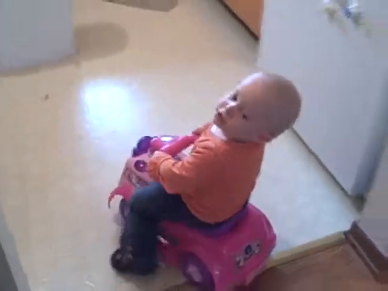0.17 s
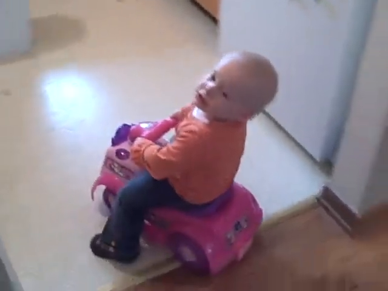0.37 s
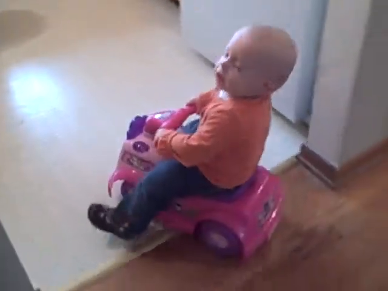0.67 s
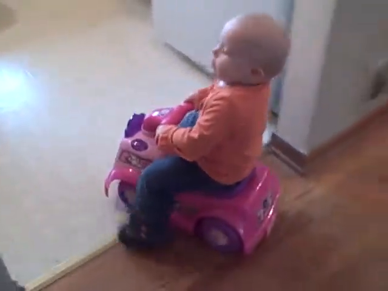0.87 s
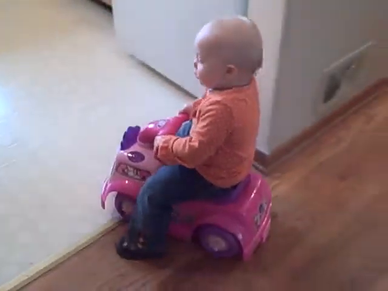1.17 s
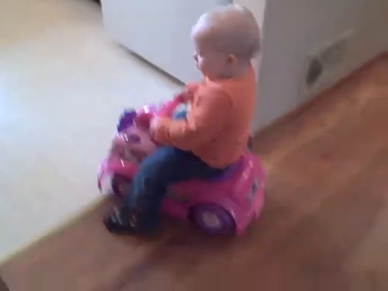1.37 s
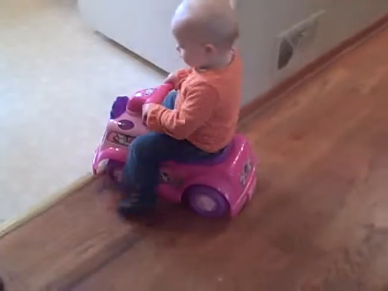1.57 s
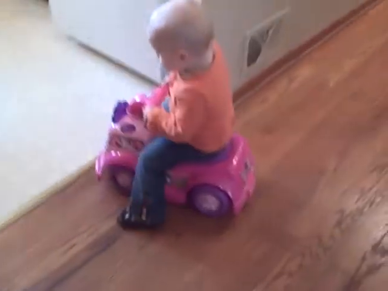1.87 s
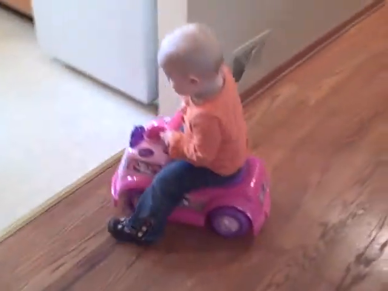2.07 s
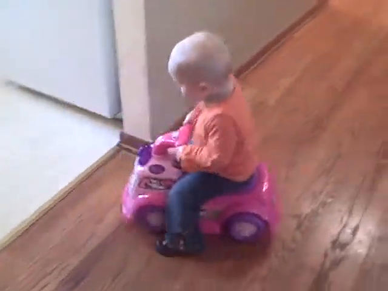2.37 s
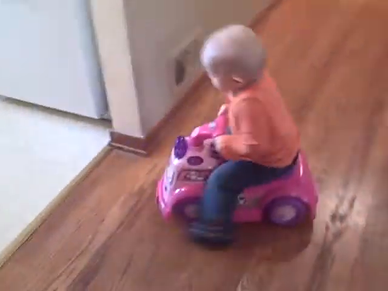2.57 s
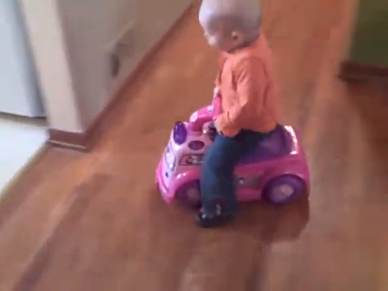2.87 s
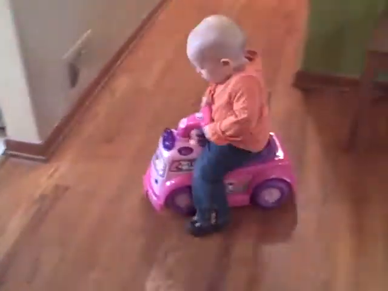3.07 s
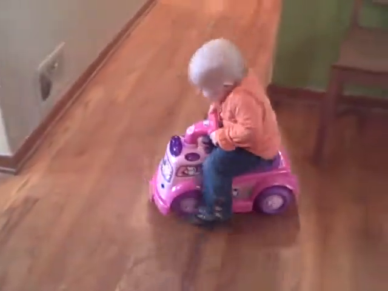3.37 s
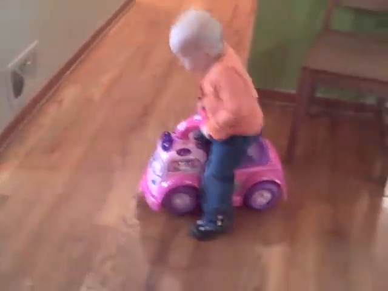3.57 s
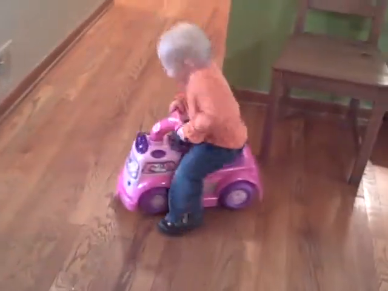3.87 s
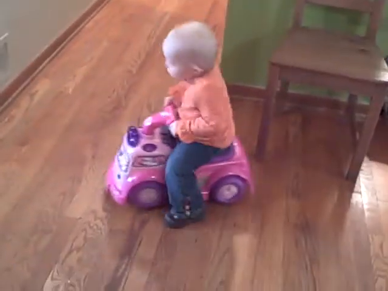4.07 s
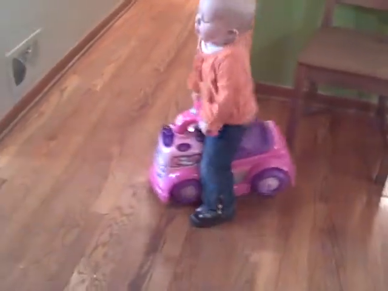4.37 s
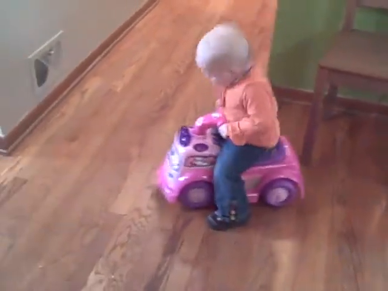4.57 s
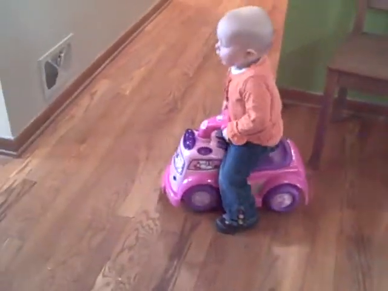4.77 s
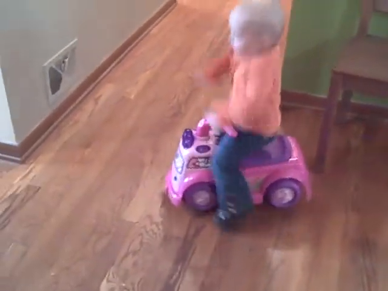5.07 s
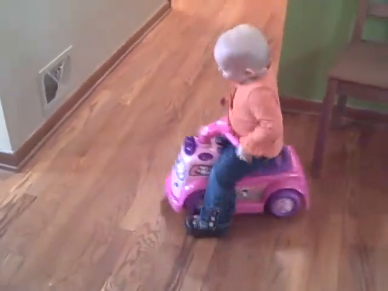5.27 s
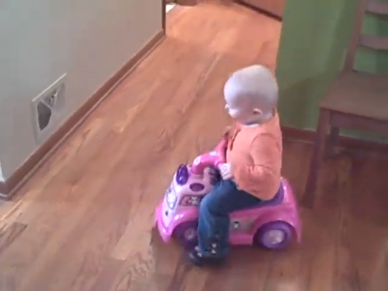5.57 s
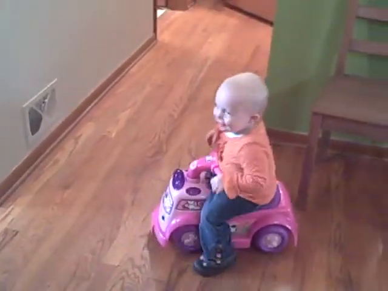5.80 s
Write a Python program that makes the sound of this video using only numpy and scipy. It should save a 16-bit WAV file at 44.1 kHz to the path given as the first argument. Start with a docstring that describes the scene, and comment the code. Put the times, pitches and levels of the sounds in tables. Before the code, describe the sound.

A mono indoor pickup, a few steps from a hollow plastic ride-on car on hardwood, in a bare room with about half a second of reverberation. A faint, wavering low refrigerator hum and soft room air sit underneath, the hum slowly fading. From 0 to 0.7 seconds, light plastic ticks and knocks lead to a crisper clack. From 1 to 2.7 seconds it is quieter: small dull bumps, short rumbling, gritty shoves, brushing soles and a barely audible axle squeak near 1.2. A fuller knock comes at 3.0 and a hollow double thud at 3.5. A tight burst of loud, bright clacks strikes around 3.8 to 3.9. The strongest cluster follows at 4.4 to 4.6, with a hollow body note, then smaller knocks at 4.7 to 5.05 and another sharp bang at 5.2. Rolling and scraping rise again near 5.3, then light taps and very faint bumps die away by 5.85.

```python
"""A bare room with a hardwood floor, beside a kitchen: a toddler shuffles a hollow plastic ride-on car
over a threshold and along the boards, then bounces on its seat. Each knock excites modes of floor, hollow
body and panels, and ticks at the contact; dull bumps are decaying hollow notes. Filtered noise and grit make
the rolling wheels, brushing soles, a faint axle squeak and the room air. A refrigerator hums as a wavering
sine, and echoes with band-by-band decay return the knocks, bumps and scrape."""
import sys
import numpy as np
from scipy import signal
from scipy.fft import rfft, irfft
from scipy.io import wavfile

SR = 44100
rng = np.random.default_rng(int(sys.argv[2]) if len(sys.argv) > 2 else 0)


def master(y):
    """Save y as 16-bit WAV."""
    cut = np.clip(np.atleast_2d(y).T, -1, 1)
    pcm = np.round(cut * 32767)  # scale
    wavfile.write(sys.argv[1], SR, pcm.astype(np.int16))


N = 261689  # length of the scene in samples
T = np.arange(int(.65 * SR)) / SR  # time axis of one short sound, s

# Knocks of the car: start_s, strength_db, contact_hardness_db, floor_share_db, chatter_s
KNOCK_EVENTS = [ (0.077, -57, 4, -15.5, .005), (.162, -54, -4, 0, .002), (0.2774, -51.5, -4, 3, .0005),
                (0.3959, -44, 9.5, -21, .0016), (0.489, -44.5, 2.5, -25, .005),
                (.508, -48.5, -2.5, 1.5, .003), (.653, -47, 5, 0.5, 0.0037),
                (0.6858, -36.5, 11.5, -16, .0015), (1.033, -56, 0, 8, .005), (1.287, -56, 3, -9, .002),
                (1.545, -54.5, -4, -16, .002), (1.567, -47, 0, 1.5, 0.0034), (1.645, -51.5, -6.5, -2, .002),
                (1.685, -54, -8, -7, 0.0035), (1.882, -59, 5.5, 0, 0.005), (2.1545, -62.5, 25, 0, .002),
                (2.308, -54.5, -15, -14, .02), (2.6111, -47, -0.5, 2.5, .0007), (2.89, -54, -7.5, 5, .003),
                (2.9885, -34.5, 1.5, -8, .0012), (3.012, -33, 4, 5, .015), (3.156, -47.5, -4.5, 9, .008),
                (3.2153, -45.5, -3, -3, .0007), (3.413, -55.5, 3, -8, .003), (3.516, -37, -3, 5, .0011),
                (3.5247, -31, -2.5, 3, .0016), (3.698, -47.5, -3, -6, 0.0095), (3.7996, -49.5, 6, -6, .004),
                (3.8149, -36.5, 3, -20, .005), (3.821, -24, -0.5, -3, .0096), (3.8576, -21, 7, -5.5, .0004),
                (3.864, -25, 0, -0.5, 0.0013), (3.881, -27, 13, 0, 0.0014),
                (4.2606, -55.5, -1.5, -1.5, .001), (4.3609, -45.5, -5, -12, .007),
                (4.4113, -39.5, 1.5, -19, .0023), (4.458, -30.5, -1.5, -17, .007),
                (4.509, -35, -1, 2.5, .011), (4.559, -20, 16.5, 1.5, .0013), (4.563, -17, 0, -3, .004),
                (4.727, -37, 9, -29, .008), (4.767, -40.5, 0.5, -20, .003), (4.8458, -29, 1, -16, .0004),
                (4.859, -35, -5.5, -1, .0013), (4.9975, -27, 4, -10.5, 0.0013),
                (5.045, -33.5, -2.5, -2, .023), (5.178, -39, -2, -31, .008), (5.1911, -27, 11, -0.5, .004),
                (5.1952, -20.5, 2.5, -17, .002), (5.4051, -38, 5.5, -24, .0023),
                (5.468, -46, 2.5, -20, .0024)]
# Resonances of the floor boards: pitch_hz, level_db, t60_s
FLOOR_MODES = [(59.5, -4.5, 0.11), (82, -14.5, 0.16), (128.3, -2, 0.19), (153, 0, 0.29), (190, 2.5, 0.082)]
# Resonances of the hollow car body: pitch_hz, level_db, t60_s
BODY_MODES = [(235.5, -2.5, 0.055), (294, 0.5, 0.094), (334.6, 0.5, 0.041), (380, -4, 0.1),
              (431, -7.5, 0.12), (478.2, -4.5, 0.078), (577, -13, 0.14)]
# Resonances of the plastic panels: pitch_hz, level_db, t60_s
PANEL_MODES = [(730, -0.5, 0.083), (745, -2.5, 0.087), (1030, -8, 0.04), (1114, 1.5, 0.047),
               (1226, 2, 0.044), (1380, 6, 0.035), (1640, -2.5, 0.071), (1782, 2.5, 0.043),
               (1971, 2, 0.045), (2390, -2.5, 0.033)]
# Relative spectrum of the crowded panel modes at hardness 0 dB: frequency_hz, density_db_per_hz
CLACK_SPECTRUM = [(250, -26.5), (550, 1), (800, 8.5), (1200, 0), (1800, 3.5), (2600, 1.5), (3700, -14),
                  (6000, -52.5), (16000, -68)]
# Relative spectrum at the point of contact, before the strength lift: frequency_hz, density_db_per_hz
TICK_SPECTRUM = [(600, -28), (2000, -8), (3200, -1), (4900, 0), (7300, -2.5), (8600, -6.5), (10500, -7.5),
                 (13000, -10.5), (16000, -11)]
# Relative spectrum of stiff plastic snapping at the contact: frequency_hz, density_db_per_hz
SNAP_SPECTRUM = [(1500, -43), (3500, 1), (5000, 2), (7000, -7.5), (9000, -16), (16000, -50)]
# Dull bumps of shoes, wheels and the rider's weight on the hollow car: start_s, pitch_hz, level_db
BUMP_EVENTS = [(0.161, 265.5, -33), (.69, 54.6, -43), (1.027, 268, -45), (1.644, 686, -42.5),
               (1.686, 276, -30), (2.314, 680, -45), (2.756, 157, -34.5), (3.024, 820, -37),
               (3.524, 257, -25.5), (4.568, 382, -14.5), (4.584, 143, -25.5), (5.198, 260, -26),
               (5.781, 290, -46.5), (5.835, 149, -49)]
# Shoves that roll the car a little way: top_speed_s, length_s, rumble_db, scrape_db
SHOVE_EVENTS = [(0.006, 0.2, -57, -54), (0.306, 0.14, -47.5, -77), (0.878, 0.12, -55, -56),
                (1.698, 0.068, -47, -50), (2.054, .14, -57, -63.5), (2.306, 0.041, -45.5, -49),
                (2.57, 0.22, -48.5, -52), (2.713, 0.069, -38.5, -43.5), (3.066, 0.17, -39, -46),
                (3.39, 0.02, -45, -48.5), (3.66, 0.19, -46, -50), (4.02, 0.079, -46, -48),
                (4.432, 0.14, -44.5, -47.5), (4.95, .17, -45, -44.5), (5.297, 0.1, -39, -41)]
# Relative spectrum of wheels rumbling on boards: frequency_hz, density_db_per_hz
RUMBLE_SPECTRUM = [(25, -32), (55, 7), (90, 7), (150, 2.5), (290, 5), (480, -3.5), (900, -8.5),
                   (1600, -33.5), (5000, -66)]
# Relative spectrum of one scraping grain of grit: frequency_hz, density_db_per_hz
SCRAPE_SPECTRUM = [(300, -9.5), (900, 11.5), (1700, 3), (2600, 2.5), (4200, -3), (6500, -5.5), (9000, -6.5),
                   (16000, -13)]
# Shoe soles hissing over the floor: peak_s, length_s, level_db
SCUFF_EVENTS = [(.19, .06, -61), (.87, 0.091, -64), (1.73, 0.11, -62), (2.33, .05, -63), (2.72, 0.072, -58),
                (3.39, .03, -58)]
# Relative spectrum of a brushing sole: frequency_hz, density_db_per_hz
SOLE_SPECTRUM = [(1000, -29), (3000, -6), (7000, -2), (11000, 0), (16000, -3)]
# Resonances of a rubbing axle: pitch_hz, width_hz (before broadening), level_db (relative)
AXLE_MODES = [(2850, 34, -5), (3540, 45, -7), (3920, 29, -4)]
# The rider's weight heaving on the boards: peak_s, length_s, level_db
HEAVE_EVENTS = [(3.85, .35, -43.5), (4.65, .35, -51.5)]
# Relative spectrum of the room air: frequency_hz, density_db_per_hz
AIR_SPECTRUM = [(20, -34.5), (55, 8.5), (90, -9.5), (140, 5.5), (300, -1.5), (600, -2.5), (1500, -16.5),
                (4500, -19.5), (9000, -27), (16000, -29.5)]
# Reverberation time of the bare room: frequency_hz, t60_s
ROOM_DECAY = [(80, 0.58), (260, 0.45), (700, 0.55), (1840, 0.58), (4850, 0.51), (8000, 0.41), (14000, 0.29)]

BODY_DB, TICK_DB = 4, -4.5  # boom and tick relative to the clack, at hardness 0 dB
TICK_PER_HARDNESS = 0.47  # tick gain in dB per dB of hardness; the boom loses 1 dB per dB
CLACK_OCTAVES_PER_DB = 0.0347  # upward shift of the clack per dB of hardness
LIFT_PER_DB, LIFT_FROM_DB = 0.43, -29.5  # treble lift of the tick per dB of strength above this level
SNAP_DB, SNAP_CHATTER_S = -6, .002  # snap beside the tick; it fades out for longer chatter
FLOOR_LAG_S, BODY_LAG_S = .005, .0015  # the heavy parts answer a moment after the contact
SWELL_CYCLES = 0.87  # time constant of a bump, in cycles of its note
RISE_DB, COAST_DB = 12, 7.5  # gained over one length before a peak, lost over one length after it
CREEP_RUMBLE_DB, CREEP_SCRAPE_DB = -65.5, -65  # the car never stands quite still
SOLE_REST_DB, SWAY_REST_DB = -79, -61  # resting levels of the soles and of the deep rumble
HUM_DB, HUM_FADE_DB_PER_S = -55, 3  # the refrigerator fades as the car leaves the kitchen
EDGE_HZ = 16100  # upper band limit


def knocks(panel_ring_db=-3, bright_hz=8000, snap_decay=0.00017):
    """Impact excitation: loose plastic chatters briefly, and floor, body and panels ring on as resonators."""
    out, snap_colour = np.zeros(N), colour(SNAP_SPECTRUM)
    hz = np.fft.rfftfreq(2 * len(snap_colour), 1 / SR)
    treble = 1 / (1 + (bright_hz / (hz + 1)) ** 6)
    for start_s, strength_db, hard_db, floor_db, chatter in KNOCK_EVENTS:
        echoes = room()  # the echoes change as car and rider move

        # the low modes feel the contact as one push
        push = signal.unit_impulse(len(T))
        floor_ring = ring(FLOOR_MODES, vary_db=1.5, detune=0.0069)
        thump = later(through(push + gain_of(-5.0) * echoes, floor_ring), FLOOR_LAG_S)
        body_ring = ring(BODY_MODES, vary_db=3.0, detune=0.0069)
        boom = later(through(push + gain_of(3.5) * echoes, body_ring), BODY_LAG_S)

        # a few clear panel modes stand out of many crowded ones
        rattle = blow(chatter, echoes, wet_db=0.5, buzz_db=-2.5, buzz_decay=0.008,
                      rebound_db=-3.0, snap_db=3.5)
        panels = unit(through(rattle, ring(PANEL_MODES, vary_db=-1.0, detune=0.0089)))
        shifted_hz = hz / 2 ** (CLACK_OCTAVES_PER_DB * hard_db)
        clack_colour = colour(np.transpose([hz, read(CLACK_SPECTRUM, shifted_hz)]))
        clack = unit(through(rattle, clack_colour)) + gain_of(panel_ring_db) * panels

        # a stronger contact lifts the top octave
        lift_db = LIFT_PER_DB * (strength_db - LIFT_FROM_DB)
        tick_colour = colour(np.transpose([hz, read(TICK_SPECTRUM, hz) + lift_db * treble]))
        tick_blow = blow(chatter, echoes, wet_db=0.5, buzz_db=-0.5, buzz_decay=0.005,
                         rebound_db=-9.0, snap_db=2.5)
        tick = through(tick_blow, tick_colour)
        snap_gain = gain_of(SNAP_DB) * np.exp(-chatter / SNAP_CHATTER_S)
        snap = snap_gain * unit(through(burst(snap_decay), snap_colour))

        tick_db = TICK_DB + TICK_PER_HARDNESS * hard_db
        parts = ((floor_db, thump), (BODY_DB - hard_db, boom), (0, clack), (tick_db, unit(tick) + snap))
        add(out, start_s, sum(gain_of(strength_db + db) * loudness(part) for db, part in parts))
    return out


def blow(chatter, echoes, wet_db, buzz_db, buzz_decay, rebound_db, snap_db,
         crush_time=0.077, snap_time=0.00072, hard_time=0.0016):
    """Contact mechanics: a crush or snap, the short buzz of damped plastic, rebounds, and room echoes."""
    chatter = max(chatter, 1e-4)
    build = 1 - np.exp(-T * crush_time / chatter ** 2)  # long contacts build up softly
    contact = unit(burst(chatter) * build)
    snap = gain_of(snap_db) * np.exp(-chatter / hard_time) * burst(snap_time)  # short ones start with a snap
    onset = 1 - np.exp(-T / chatter)  # the room fills as the contact goes on
    buzz = gain_of(buzz_db) * burst(buzz_decay)
    after = buzz + gain_of(rebound_db) * rebounds() + gain_of(wet_db) * echoes
    return unit(contact + snap) + onset * after


def rebounds(per_s=300, decay=0.026, ring_time=0.00096):
    """Repeated impact with energy loss: loose parts tap at uneven moments, ever more weakly."""
    struck = rng.random(len(T)) < per_s / SR
    taps = struck * rng.uniform(.3, 1, len(T)) * np.exp(-T / decay) * (T > .004)
    envelope = signal.lfilter([1], [1, -np.exp(-1 / (ring_time * SR))], taps)
    return unit(envelope * rng.standard_normal(len(T)))


def burst(decay):
    """Superposed micro-impacts: noise whose amplitude dies exponentially."""
    return unit(rng.standard_normal(len(T)) * np.exp(-T / max(decay, 1e-4)))


def ring(modes, vary_db, detune, size=8000):
    """Modal superposition: damped sines, weighted anew since every blow lands elsewhere."""
    hz, db, t60 = np.transpose(modes)[:, :, None]
    weight, shift, side = rng.standard_normal((3, len(modes), 1))
    t = T[:size]
    envelope = gain_of(db + vary_db * weight - 60 * t / t60)
    waves = np.sign(side) * envelope * np.sin(2 * np.pi * hz * (1 + detune * shift) * t)
    return unit(waves.sum(0))


def bumps(wall_delay=0.0139, wet_db=-4):
    """Damped resonance: a soft blow swells into a few cycles of one hollow note, which the walls return."""
    out = np.zeros(N)
    for start_s, hz, db in BUMP_EVENTS:
        swell = SWELL_CYCLES / hz
        note = unit((T / swell) ** 2 * np.exp(-T / swell) * np.sin(2 * np.pi * hz * T))
        echoes = later(room(), wall_delay)
        returned = gain_of(wet_db) * unit(through(note, echoes))
        add(out, start_s, gain_of(db) * loudness(note + returned))
    return out


def wheels(echoes, grits_per_s=1800, grit_spread_db=3, wet_db=4):
    """Rolling and friction noise: hard wheels rumble; random impulses of grit and soles scrape."""
    rumble = surges([(s, length, db) for s, length, db, _ in SHOVE_EVENTS], CREEP_RUMBLE_DB)
    scrape = surges([(s, length, db) for s, length, _, db in SHOVE_EVENTS], CREEP_SCRAPE_DB)
    size_db = grit_spread_db * np.minimum(rng.exponential(1, N), 3)
    sizes = rng.choice([-1, 1], N) * gain_of(size_db)
    grit = through(sizes * (rng.random(N) < grits_per_s / SR), colour(SCRAPE_SPECTRUM))
    grit_in_room = evened(grit + gain_of(wet_db) * through(grit, echoes))
    return rumble * noise(RUMBLE_SPECTRUM) + scrape * grit_in_room


def scuffs():
    """Sliding friction: soles brush the floor as the feet push off, heard as swells of hiss."""
    return surges(SCUFF_EVENTS, SOLE_REST_DB) * noise(SOLE_SPECTRUM)


def squeak(peak_s=1.214, length=0.065, level_db=-64.0, broadening=2.9):
    """Frictional resonance: a rubbing axle whistles faintly in narrow noise bands as the car turns."""
    hz = np.fft.rfftfreq(N, 1 / SR)
    shape = sum(gain_of(db) / (1 + (2 * (hz - f) / (broadening * width)) ** 2)
                for f, width, db in AXLE_MODES)
    whistle = evened(irfft(rfft(rng.standard_normal(N)) * shape, N))
    swell = np.exp(-.5 * ((np.arange(N) / SR - peak_s) / length) ** 2)
    return gain_of(level_db) * whistle * swell


def house(air_db=-57, hum_hz=120, hum_waver_db=2, sway_hz=29, sway_width_hz=5):
    """Steady background: room air, a refrigerator's modulated tone, and deep rumble under moving weight."""
    t = np.arange(N) / SR
    hz = np.fft.rfftfreq(N, 1 / SR)
    waver = evened(irfft(rfft(rng.standard_normal(N)) * np.exp(-(hz / 4) ** 2), N))  # a few Hz
    hum = np.sqrt(2) * np.sin(2 * np.pi * hum_hz * t) * gain_of(hum_waver_db * waver)
    hum_level = gain_of(HUM_DB - HUM_FADE_DB_PER_S * t)
    sway_shape = 1 + ((hz - sway_hz) / sway_width_hz) ** 2
    sway = evened(irfft(rfft(rng.standard_normal(N)) / sway_shape, N))
    air = gain_of(air_db) * noise(AIR_SPECTRUM)
    return air + hum_level * hum + surges(HEAVE_EVENTS, SWAY_REST_DB) * sway


def room(near_db=-2, near_decay=0.025, gap=0.0034, build=0.0072):
    """Reverberation: sparse early echoes from floor and walls, then a tail that dies band by band."""
    hz, t, z = signal.stft(rng.standard_normal(len(T)), SR, nperseg=256)
    decay = gain_of(-60 * t / read(ROOM_DECAY, hz)[:, None])
    tail = signal.istft(z * decay, SR, nperseg=256)[1][:len(T)]
    sparse = rng.standard_normal(len(T)) * (rng.random(len(T)) < 3000 / SR)
    near = sparse * np.exp(-T / near_decay) * (T > gap)
    return unit(unit(tail * (1 - np.exp(-T / build))) + gain_of(near_db) * unit(near))


def surges(rows, rest_db):
    """Power addition: each (peak s, length s, dB) gathers level, then coasts back towards rest."""
    power = np.full(N, gain_of(rest_db) ** 2)
    for peak_s, length, db in rows:
        u = (np.arange(N) / SR - peak_s) / length
        power += gain_of(db - np.maximum(-RISE_DB * u, COAST_DB * u)) ** 2
    return np.sqrt(power)


def noise(points):
    """Spectral shaping: steady noise with the given spectrum at rms 1."""
    return evened(through(rng.standard_normal(N), colour(points, size=8192)))


def colour(points, size=2048):
    """Minimum phase: the causal filter that follows from a log-magnitude spectrum."""
    log_gain = np.log(gain_of(read(points, abs(np.fft.fftfreq(size, 1 / SR)))))
    return np.fft.ifft(np.exp(np.conj(signal.hilbert(log_gain)))).real[:size // 2]


def read(points, hz):
    """Logarithmic frequency: interpolates a table on a log axis."""
    f, value = np.transpose(points)
    return np.interp(np.log(hz + 1), np.log(f + 1), value)


def through(x, response):
    """Linear filtering: convolves and keeps the length."""
    return signal.fftconvolve(x, response)[:len(x)]


def later(x, s):
    """Propagation delay: shifts a sound by s seconds."""
    return np.pad(x, (round(abs(s) * SR), 0))[:len(x)]


def add(mix, s, sound):
    """Superposition: mixes a sound in at time s."""
    part = mix[round(s * SR):][:len(sound)]
    part += sound[:len(part)]


def loudness(sound):
    """Equal energy: gives a short sound the energy of 40 ms at rms 1."""
    return unit(sound) * np.sqrt(.04 * SR)


def unit(x):
    """Energy normalisation: scales to energy 1."""
    return x / np.sqrt(np.sum(x ** 2) + 1e-20)


def evened(x):
    """Power normalisation: scales to rms 1."""
    return x / np.sqrt(np.mean(x ** 2) + 1e-20)


def gain_of(db):
    """Decibel law: amplitude ratio of a level in dB."""
    return 10 ** (np.asarray(db) / 20)


def scene():
    """Superposition of all sources at one microphone, a few steps from the car."""
    car = knocks() + bumps() + wheels(room())
    return (car + scuffs() + squeak() + house())[None]


def record(dry):
    """Saturation and band limit: rounds off the loudest peaks, then low-passes."""
    rounded = np.tanh(dry)
    lowpass = signal.firwin(255, EDGE_HZ, window=("kaiser", 9), fs=SR)
    return signal.oaconvolve(rounded, lowpass[None], "same")


dry = scene()
out = record(dry)
master(out)
```